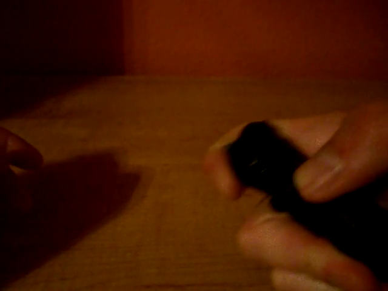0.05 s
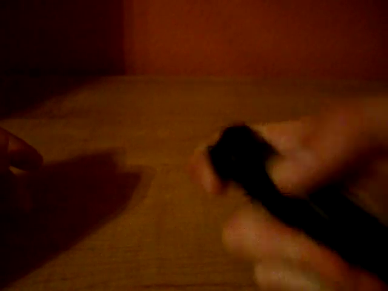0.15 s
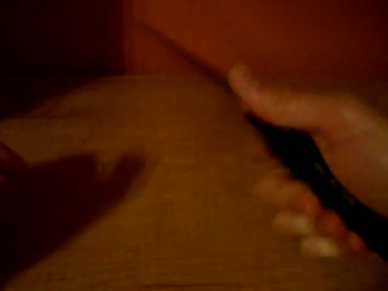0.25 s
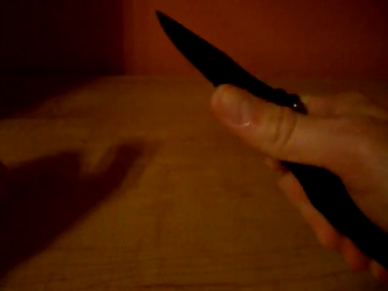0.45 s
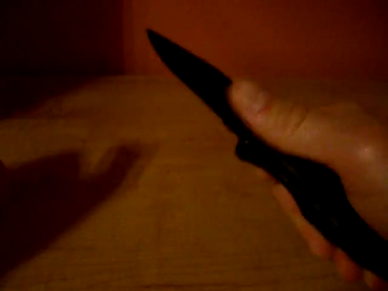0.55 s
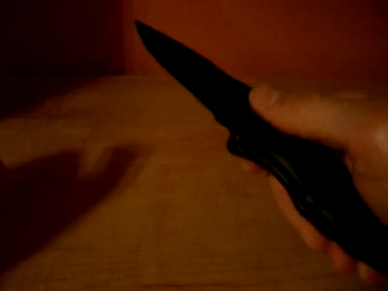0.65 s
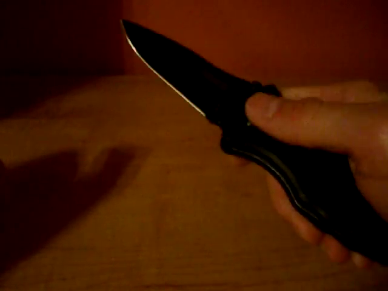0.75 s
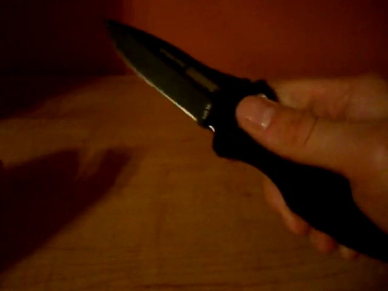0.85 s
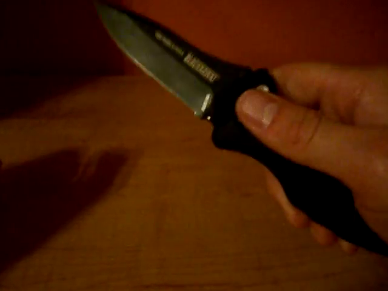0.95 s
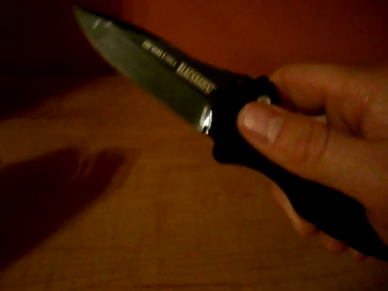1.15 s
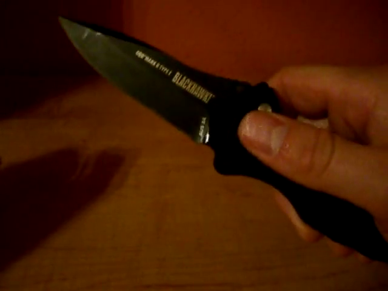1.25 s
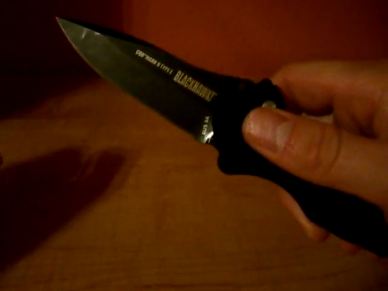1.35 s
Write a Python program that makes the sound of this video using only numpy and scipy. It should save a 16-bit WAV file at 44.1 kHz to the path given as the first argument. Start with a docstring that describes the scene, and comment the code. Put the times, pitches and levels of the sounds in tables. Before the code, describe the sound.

One sharp steel snap as a pocket knife is thumbed open, with faint handling noise.

```python
"""A folding knife is thumbed open, close to a small camera in a quiet room.
The steel blade scrapes out of the handle, swings on its pivot and snaps into the lock with a crack
and a short ring, and the room echoes briefly. The snap overloads the microphone with a low thump.
The camera turns itself down, so its hiss drops, then creeps back while fingers shift on the handle."""
import sys
import numpy as np
from scipy import signal
from scipy.fft import rfft, irfft
from scipy.io import wavfile
from scipy.ndimage import minimum_filter1d

SR = 44100
rng = np.random.default_rng(int(sys.argv[2]) if len(sys.argv) > 2 else 0)


def pcm_store(signal):
    """Save signal as 16-bit PCM."""
    levels = np.round(np.clip(np.atleast_2d(signal), -1, 1) * 32767)
    wavfile.write(sys.argv[1], SR, levels.astype(np.int16).T)


N = 61739
TIME = np.arange(N) / SR
FREQS = np.fft.rfftfreq(N, 1 / SR)

# A TONE table gives a sound's balance from low to high, not its loudness.
# Background rumble and hiss: pitch_hz, level_db
HISS_TONE = [(10, -3), (25, 3), (65, -0.5), (125, -3), (190, -9), (350, -14), (440, -12), (700, -20.5),
             (1100, -22), (1450, -21.5), (2200, -25.5), (5000, -31.5), (10000, -33), (13000, -36),
             (17000, -33.5)]
# The room's echo: pitch_hz, level_db
ROOM_TONE = [(200, -21), (1000, -15.5), (1700, -8.5), (2700, -12), (3050, -9), (3450, -1), (4200, -7),
             (5400, -2), (6600, -1), (9000, 1.5), (10500, 2), (12000, -5.5), (14000, -13), (17000, -14)]
# Time the echo takes to fade by 60 dB: pitch_hz, fade_s
ROOM_FADES = [(200, .3), (2500, 0.48), (3600, 0.53), (7000, 0.49), (10500, 0.41), (13000, .33),
              (17000, .25)]
# Fingers sliding on the handle: peak_s, rise_s, fall_s, level_db
FINGER_SLIDES = [(.02, 0.056, 0.19, -55.5), (0.186, 0.038, 0.038, -51), (.635, 0.02, 0.016, -56),
                 (.688, 0.023, 0.013, -53.5), (.792, 0.013, 0.06, -56.5)]
# Brushing skin: pitch_hz, level_db
SKIN_TONE = [(500, -27.5), (2000, -12), (3800, -2.5), (5000, -1), (6800, 3.5), (8200, -0.5), (9800, 1.5),
             (12500, -9.5), (17000, -31.5)]
# Rustling palm: pitch_hz, level_db
PALM_TONE = [(40, -1.5), (150, -0.5), (330, -3.5), (550, -11.5), (780, -8), (1100, -25), (3000, -45)]
# Thumb settling on the handle: pitch_hz, level_db
THUMB_TONE = [(100, 0), (500, -1), (900, -7), (1450, -4.5), (2200, -14.5), (4000, -14.5), (8000, -26),
              (17000, -41)]
# Soft bumps of the hand: start_s, length_s, level_db
HAND_BUMPS = [(0.229, 0.025, -37.5), (.244, .004, -32), (0.263, .018, -37), (0.723, 0.021, -33),
              (0.817, .008, -36), (1.043, 0.013, -39)]
# Ringing notes of the knife's steel: pitch_hz, relative_level_db, fade_s
STEEL_NOTES = [(3240, -11, .03), (3591, -22, .13), (4570, -7, .035), (4907, -10, .04), (5190, -10, .04),
               (5670, -11, .04), (6288, -14, .04), (6900, -10, .04), (7175, -14, .05), (8240, -8, .045),
               (8395, -7, .045), (8970, -6, .045), (10045, -3, .04), (10355, -4, .045)]
# Steel rubbing and rattling on steel: pitch_hz, level_db
RUB_TONE = [(200, -7), (600, -17.5), (780, -5), (1000, -23), (1500, -10.5), (1900, -14), (2650, 0),
            (3300, -7.5), (4800, -1), (6800, -5), (8800, 0), (10200, 2.5), (11500, -4.5), (13200, -7.5),
            (14500, -12), (17000, -21.5)]
# Scrapes of the opening blade: peak_s, rise_s, fall_s, level_db, boost_pitch_hz, boost_db
BLADE_SCRAPES = [(0.184, 0.0022, 0.0018, -43.5, 3260, 23), (.208, 0.0063, 0.002, -19.5, 8200, 8.5),
                 (0.2109, .0006, 0.0063, -20, 2420, 8), (0.231, 0.0071, 0.017, -26, 10500, -1),
                 (.246, 0.0038, 0.006, -32.5, 5000, -14), (.284, 0.022, 0.0093, -42.5, 9700, -5.5),
                 (0.3002, 0.00018, 0.00076, -25.5, 4300, 11)]
# Knock of the bending blade: pitch_hz, level_db
KNOCK_TONE = [(100, -27), (700, -24), (1050, -15), (1400, -1), (2600, -1), (3600, -4.5), (4700, -1),
              (6200, -12), (10000, -12), (17000, -28)]
# Crack of each hit in the lock: pitch_hz, level_db
CRACK_TONE = [(200, -26), (1050, -26), (2000, -15), (3400, -19), (4700, 0), (6200, -8), (9000, 1),
              (12000, -12.5), (15000, -6), (17000, -17)]
# The blade hitting its stop, then the lock's spring: start_s, relative_level_db
LOCK_HITS = [(.3027, 0), (.3038, 2)]


def gain(db):
    """Turns decibels into a multiplier."""
    return 10 ** (np.asarray(db) / 20)


def normalize(x):
    """Scales a sound to an average power of 1."""
    return x / np.sqrt(np.mean(x ** 2) + 1e-20)


def look_up(table, hz=FREQS):
    """Reads between a table's rows on a musical pitch scale."""
    pitches, values = np.transpose(table)
    return np.interp(np.log(hz + 1), np.log(pitches + 1), values)


def equalize(x, db):
    """Turns each frequency up or down."""
    return irfft(rfft(x) * gain(db), N)


def noise(tone):
    """Steady noise shaped by a tone table."""
    return normalize(equalize(rng.standard_normal(N), look_up(tone)))


def fade(start_s, fade_s):
    """Starts suddenly, then drops 60 dB every fade_s."""
    return (TIME >= start_s) * 1000. ** (-np.maximum(TIME - start_s, 0) / fade_s)


def swell(peak_s, rise_s, fall_s):
    """Rises smoothly to a peak, then dies away."""
    age = TIME - peak_s
    return np.exp(-(np.minimum(age, 0) / rise_s) ** 2 - np.maximum(age, 0) / fall_s)


def notch(x, hz, width_hz, depth):
    """Hollows out one band of pitches."""
    return x - depth * signal.lfilter(*signal.iirpeak(hz, hz / width_hz, fs=SR), x)


def background():
    """Rumble and hiss, with the camera's faint whistle, thin whine and a buzz at every frame."""
    whistle_hz, width_hz, whine_hz, buzz_hz, frames_per_s = 13700, 250, 15735, 7950, 30
    whistle_db = -20 * np.log10(1 + ((FREQS - whistle_hz) / width_hz) ** 2)
    whistle = gain(-76) * normalize(equalize(rng.standard_normal(N), whistle_db))
    whine = gain(-68) * normalize(np.sin(2 * np.pi * whine_hz * TIME))
    from_frame_s = ((TIME * frames_per_s + .5) % 1 - .5) / frames_per_s
    buzz = gain(-57.5) * np.exp(-(from_frame_s / .0022) ** 2) * np.sin(2 * np.pi * buzz_hz * TIME)
    return gain(-46) * noise(HISS_TONE) + whistle + whine + buzz


def room_echo(x):
    """The walls return a bright wash of sound; each pitch fades at its own speed."""
    hz, t, bands = signal.stft(rng.standard_normal(N), SR, nperseg=256)
    bands = bands * gain(look_up(ROOM_TONE, hz))[:, None]
    bands *= 1000. ** (-t / look_up(ROOM_FADES, hz)[:, None])
    tail = signal.istft(bands, SR, nperseg=256)[1][:N] * np.minimum(TIME / .006, 1)
    return gain(-15.5) * signal.fftconvolve(x, tail / np.linalg.norm(tail))[:N]


def hand():
    """Skin brushes the handle, the palm rustles and bumps, and the thumb settles."""
    slides = sum(gain(db) * swell(peak, rise, fall) for peak, rise, fall, db in FINGER_SLIDES)
    brush = noise(SKIN_TONE) * slides
    palm = gain(-42) * noise(PALM_TONE) * swell(peak_s=.2428, rise_s=.015, fall_s=.012)
    thumb = gain(-55) * noise(THUMB_TONE) * swell(peak_s=1.163, rise_s=.25, fall_s=.13)
    bumps = sum(gain(db) * np.sin(np.pi * np.clip((TIME - start) / length, 0, 1))
                for start, length, db in HAND_BUMPS)
    return brush + palm + thumb + bumps


def steel_ring(start_s):
    """Struck steel rings with many high notes at once."""
    age = TIME - start_s
    return sum(gain(db) * fade(start_s, fade_s) * np.sin(2 * np.pi * (hz * age + rng.random()))
               for hz, db, fade_s in STEEL_NOTES)


def blade_scrape():
    """Steel slips on steel in tiny jerks as the blade swings out, making it ring faintly."""
    slips_per_s, spread_db = 8000, 2.5
    out, ring_spectrum = np.zeros(N), rfft(steel_ring(0))
    for peak, rise, fall, db, boost_hz, boost_db in BLADE_SCRAPES:
        sizes = gain(spread_db * np.minimum(rng.exponential(1, N), 4)) * rng.choice([-1, 1], N)
        slips = normalize(sizes * (rng.random(N) < slips_per_s / SR))
        octaves_away = np.log2((FREQS + 1) / boost_hz)
        tone_db = look_up(RUB_TONE) + boost_db * np.exp(-octaves_away ** 2)
        scrape = equalize(slips * swell(peak, rise, fall), tone_db)
        scrape /= np.sqrt(np.mean(gain(tone_db) ** 2))  # change the tone, not the power
        ring = scrape.std() * normalize(irfft(rfft(scrape) * ring_spectrum, N))
        out += gain(db) * (scrape + .13 * ring)
    return out


def blade_knock(start_s):
    """A hit sends a bend down the blade; its high notes travel faster and arrive first."""
    travel_s, at_hz = .0011, 2015
    lag_cycles = FREQS * start_s + 2 * travel_s * np.sqrt(at_hz * FREQS)
    wave = irfft(gain(look_up(KNOCK_TONE)) * np.exp(-2j * np.pi * lag_cycles), N)
    return gain(15) * wave / np.linalg.norm(wave)


def lock_snap():
    """The blade hits its stop and a spring snaps in behind it: cracks, rattle, knock and ring."""
    out = np.zeros(N)
    for start, db in LOCK_HITS:
        crack = gain(2.5) * fade(start, fade_s=.0085) * noise(CRACK_TONE)
        rattle = gain(-5) * fade(start, fade_s=.037) * noise(RUB_TONE)
        out += gain(db) * (crack + rattle)
    return out + blade_knock(LOCK_HITS[0][0]) + gain(-2.5) * steel_ring(LOCK_HITS[-1][0])


def overload_thump():
    """At the snap, the overloaded input swings down, jumps up and settles: a hollow thump."""
    jump_s, swing_s, fast_s, slow_s, settle_hz = .3041, .0009, .0035, .03, 2.9
    after, before = np.maximum(TIME - jump_s, 0), np.minimum(TIME - jump_s, 0)
    sag = fast_s / slow_s * np.exp(-after / slow_s) * np.cos(2 * np.pi * settle_hz * after)
    pulse = np.where(TIME < jump_s, -.3 * np.exp(before / swing_s), np.exp(-after / fast_s) - sag)
    muffled = signal.sosfilt(signal.butter(2, 1400, fs=SR, output="sos"), pulse)
    return gain(-5.5) * notch(muffled, hz=930, width_hz=700, depth=.7)


def scene():
    """Knife, hand and echo pass through the microphone's opening, which weakens one narrow band."""
    snap, handling = lock_snap(), blade_scrape() + hand()
    # Summed over all directions, the snap reaches the walls mostly as one plain click.
    click = gain(28) * signal.unit_impulse(N, round(LOCK_HITS[-1][0] * SR))
    echo = room_echo(click + .41 * snap + handling)
    heard = notch(snap + handling + echo, hz=7750, width_hz=270, depth=.64)
    return (heard + background())[None]


def record(dry):
    """The camera turns loud sound down fast and recovers slowly; the thump is added on top."""
    limit_db, react_s, hold_s, recover_db_per_s, top_hz = -11.5, .00027, .077, 49, 17100
    power_db = 10 * np.log10(signal.lfilter(np.ones(64) / 64, 1, dry[0] ** 2) + 1e-12)
    half_hold = round(hold_s * SR / 2)
    held_db = -minimum_filter1d(-power_db, size=2 * half_hold + 1, origin=half_hold, mode="nearest")
    recovery_db = TIME * recover_db_per_s
    peak_db = np.maximum.accumulate(held_db + recovery_db) - recovery_db
    smoothing = np.exp(-1 / (react_s * SR))
    cut_db = signal.lfilter([1 - smoothing], [1, -smoothing], np.maximum(peak_db - limit_db, 0))
    clipped = np.clip(dry * gain(-cut_db) + overload_thump(), -1, 1)
    treble_cut = signal.firwin(255, top_hz, window=("kaiser", 8), fs=SR)
    return signal.oaconvolve(clipped, treble_cut[None], "same")


dry = scene()
out = record(dry)
pcm_store(out)
```